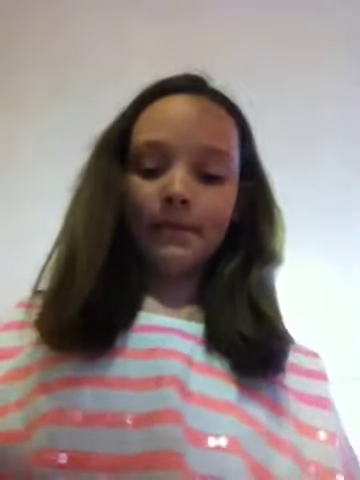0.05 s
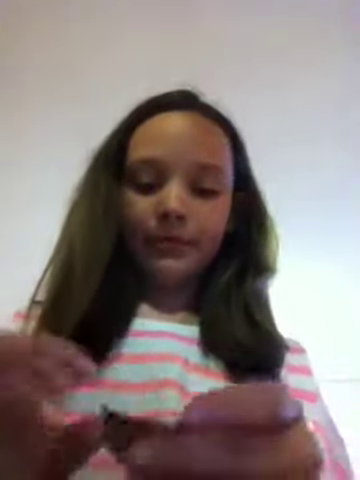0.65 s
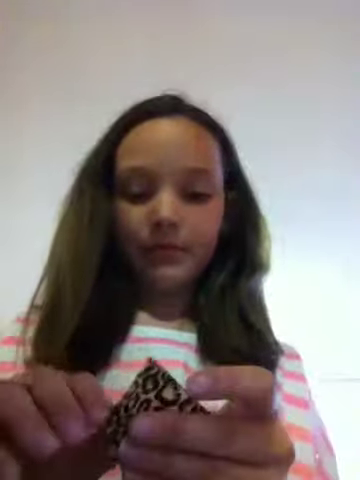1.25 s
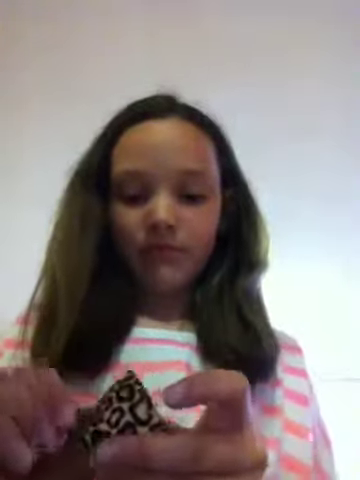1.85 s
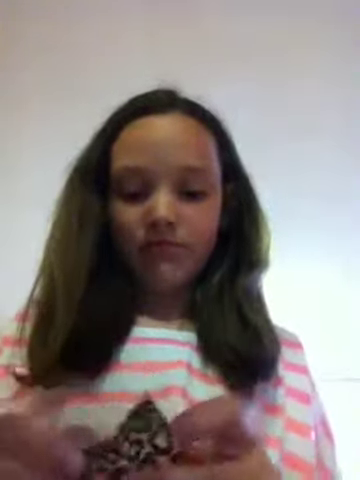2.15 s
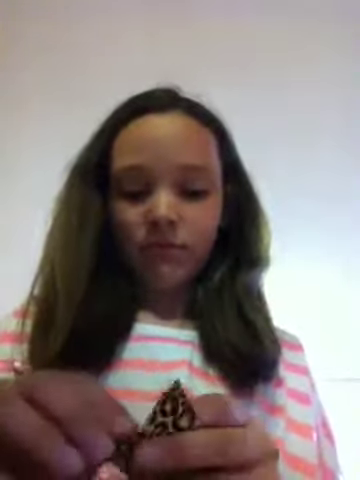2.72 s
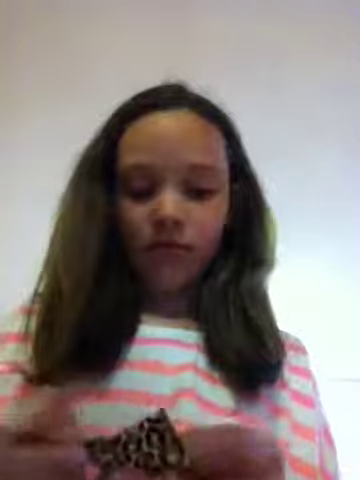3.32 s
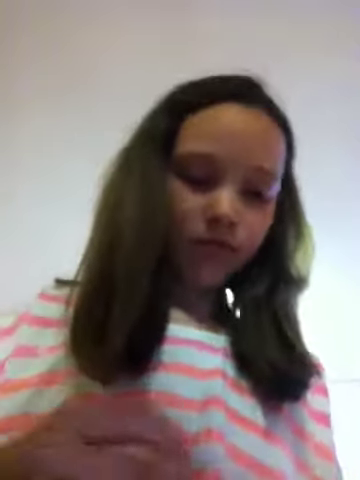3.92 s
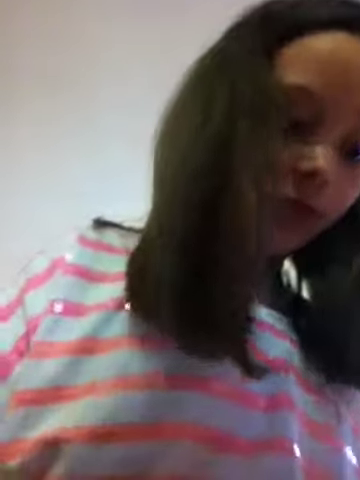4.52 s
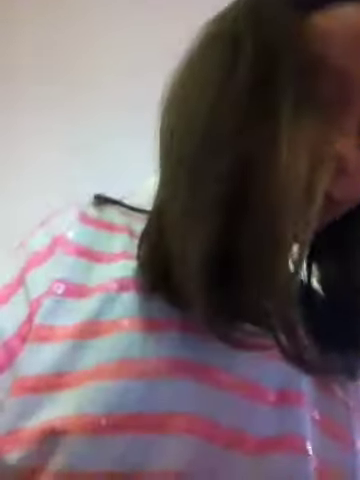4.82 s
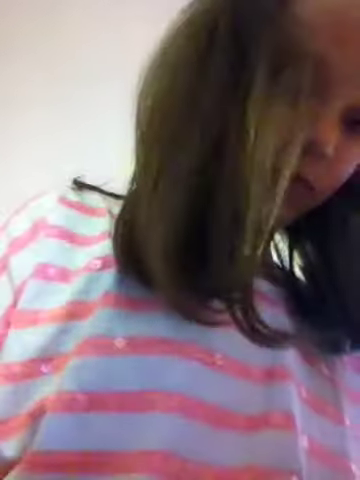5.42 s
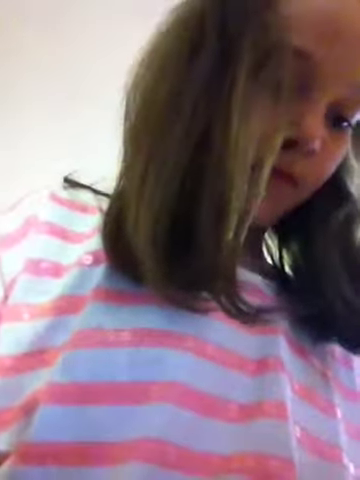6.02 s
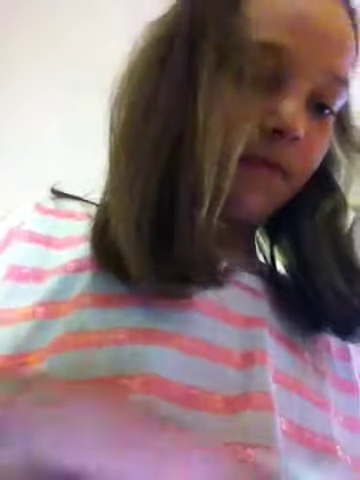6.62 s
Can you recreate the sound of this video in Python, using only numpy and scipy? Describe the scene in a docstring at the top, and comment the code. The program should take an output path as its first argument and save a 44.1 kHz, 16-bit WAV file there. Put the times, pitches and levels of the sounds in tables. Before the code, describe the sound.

Duct tape is handled close to a small microphone in a small, bare room, with a faint low appliance hum and soft hiss throughout. Right at the start a strip rips off the roll, fading within a quarter of a second. A few faint ticks follow. From about 1.1 to 2.3 seconds, fingers fold and press the tape, making irregular clusters of crisp snaps over a light sticky crackle. More snaps come around 2.8 seconds, and the loudest lands near 3.2 seconds, after which the overall level dips slightly and creeps back. From about 3.5 seconds, hands and sleeves rustle softly among scattered weaker ticks, most noticeably around 4.6 seconds. From about 5.9 to 6.7 seconds, hands slide over the work surface in several short, dry strokes with a slight hollow ring and faint hoarse squeaks.

```python
"""Duct tape is handled close to a small microphone in a quiet room, where an appliance hums throughout.
First a strip rips off the roll as thousands of glue threads break. Then creases snap and tick while
sticky fingers fold and press the tape. After the loudest snap, near 3.2 s, the recorder's gain control
turns the sound down and creeps back. Later hands rustle, and at last slide over the work surface."""
import sys
import numpy as np
from scipy import signal
from scipy.fft import rfft, irfft, next_fast_len
from scipy.io import wavfile
from scipy.ndimage import uniform_filter1d

SR = 44100
rng = np.random.default_rng(int(sys.argv[2]) if len(sys.argv) > 2 else 0)


def file_out(sig):
    """Save sig as 16-bit WAV at sys.argv[1]."""
    # one column per channel
    cols = np.atleast_2d(sig).T
    # limit, then scale
    lim = np.clip(cols, -1, 1)
    pcm = np.round(lim * 32767).astype(np.int16)
    wavfile.write(sys.argv[1], SR, pcm)


N = 293841
T = np.arange(N) / SR
PADDED = next_fast_len(N + SR, real=True)
FREQS = np.maximum(np.fft.rfftfreq(PADDED, 1 / SR), 1)

# The hollow ring of the tape roll. Each row: pitch in Hz, width in Hz, level in dB.
ROLL_MODES = [(704, 38, 10), (959, 63, 14), (1250, 110, 1.5), (1640, 51, 11.5), (3000, 50, 11)]
# The creases snapping. Each row: time in seconds, level in dB, ringing pitch in Hz, # extra bass in dB, extra
# treble in dB. The row at 3.172 s is not a crease: it is the loudest snap # coming back off the desk 8 ms
# later.
SNAPS = [(0.468, -52.5, 4000, 0, 9), (.62, -55.5, 3000, 3, -11), (.744, -60, 4000, -3, -3),
         (1.1035, -48.5, 4000, 3, -7), (1.186, -42, 3930, -5, 0), (1.209, -40.5, 8140, 1, -1.5),
         (1.2536, -36, 9550, -6, -1), (1.265, -34.5, 7200, -3, 6), (1.2733, -36.5, 3820, -27, 3),
         (1.316, -50, 1800, -5, -3), (1.347, -26.5, 6300, -14, 4.5), (1.36, -26, 6020, -20, 13),
         (1.3825, -34, 6500, -7, 10), (1.3957, -40, 6660, -8, 12), (1.4255, -47, 8900, 2, 7),
         (1.5218, -44.5, 7000, -5, -3), (1.5415, -48, 4300, 0, 0), (1.565, -32, 1800, 14.5, 2),
         (1.5776, -20, 4100, -9, 1.5), (1.602, -43, 4200, -1, 10), (1.703, -51.5, 4000, 1, -1),
         (1.765, -47, 8430, 1, 0), (1.7784, -41, 8500, 6, 5), (1.791, -42, 1770, 7.5, 0.5),
         (1.799, -42.5, 4770, 9, 4), (1.822, -44.5, 7700, 8, 2), (1.9349, -23, 4280, 1, 1),
         (1.973, -41.5, 4000, 15, 8), (2.002, -46, 1900, 19, 5), (2.016, -51, 1890, 8, 1),
         (2.0437, -44.5, 1900, -4, -4), (2.0588, -39, 8800, -1, 2), (2.2356, -42.5, 8800, -11, -1),
         (2.3, -35.5, 3680, -7, 2.5), (2.316, -36, 3980, 11, -1), (2.761, -29.5, 3980, 3, -0.5),
         (2.804, -40, 4070, 3, -14), (2.877, -34, 1790, 8, -14), (2.8884, -43.5, 1900, 9, 1),
         (3.027, -45, 4800, -3, -4.5), (3.07, -48, 2400, -3, 5), (3.1137, -26, 1810, -3, -4),
         (3.132, -35, 3800, -5, 1), (3.14, -27.5, 3840, 3, -0.5), (3.147, -40, 2000, -5, -14),
         (3.1625, -24.5, 2370, -2, 2), (3.165, -9.5, 1800, -2, -6), (3.172, -31, 1300, 2, -6),
         (3.2475, -42.5, 3900, -3, -2), (3.276, -42, 3500, -4, -9), (3.2803, -33.5, 2290, -8, -6),
         (3.492, -44, 3580, -5, -4), (3.7172, -42, 6300, -14, -4.5), (3.9956, -45, 3300, 8, -1.5),
         (4.532, -38.5, 3100, 9.5, -6), (4.548, -35.5, 1600, 7, -2.5), (4.6025, -42, 3180, -9, -6),
         (4.6435, -43.5, 3200, 5, 2), (4.6871, -43, 3300, -6, -5), (4.9277, -40.5, 3560, -15, -6.5),
         (5.0366, -45, 2300, 7, -11), (5.051, -37.5, 3950, -13, -4), (5.144, -49, 3600, -4, -3),
         (5.344, -42.5, 6300, -15, -2), (5.351, -45, 6300, -8, -1), (5.384, -54, 7600, -10, 4),
         (5.416, -53, 2150, -12, -1), (5.44, -48.5, 2230, -14, -4), (5.452, -52, 2280, -14, -10),
         (5.468, -49, 2250, -14, -7), (5.487, -50, 2250, -15, -1), (5.496, -48, 2970, -4, 5),
         (5.666, -45, 3760, -27, -2), (6.043, -39.5, 4140, -6, 2), (6.45, -39, 7800, -10, 2),
         (6.48, -46, 2800, 1, -16), (6.554, -52, 7500, -9.5, 0)]
HARD_SNAP_DB = -26  # other snaps are weighed against one of this level
# The tone of snapping, crackling tape. Each row: frequency in Hz, level in dB.
SNAP_COLOUR = [(150, -37), (300, -7.5), (750, -4.5), (1200, -5.5), (2300, 2), (5000, 1), (8500, 2.5),
               (11500, -1.5), (14000, -11), (16000, -22)]
# The ring of the folded tape. Each row: pitch in Hz, width in Hz, level in dB.
FOLD_MODES = [(576, 100, -2), (1114, 145, 6), (1840, 250, -0.5), (2280, 110, -6.5), (3100, 240, -10),
              (3980, 220, -2.5), (4770, 130, -6.5), (5830, 292, -4.5), (7500, 340, -10), (8330, 270, -19),
              (12200, 500, -6.5)]


def undb(db):
    """Turn decibels into a number to multiply by."""
    return 10 ** (np.asarray(db) / 20)


def unit(x):
    """Scale a signal so that its average (rms) level is 1."""
    return x / np.sqrt(np.mean(x ** 2))


def colour(points, freqs):
    """Join (Hz, dB) points into a tone curve: one gain for each frequency."""
    hz, db = np.transpose(points)
    return undb(np.interp(np.log(freqs), np.log(hz), db))


def ring(modes, freqs):
    """The response of an object that rings at several pitches; narrow ones ring longer."""
    return sum(undb(db) / (1 + 1j * (freqs ** 2 - hz ** 2) / (freqs * width)) for hz, width, db in modes)


def shape(x, response):
    """Filter a full-length signal with a tone curve and bring it to level 1."""
    return unit(irfft(rfft(x, PADDED) * response, PADDED)[:N])


def walk(rate):
    """A smooth random wobble of size 1 that turns about `rate` times a second."""
    step = max(int(SR / rate), 1)
    stairs = np.repeat(rng.standard_normal(N // step + 1), step)
    return unit(uniform_filter1d(stairs, step)[:N])


def slips(rate, spread_db):
    """Tiny random clicks, about `rate` a second: many weak ones, a few strong."""
    happens = rng.random(N) < rate / SR
    return happens * rng.choice([-1, 1], N) * undb(spread_db * np.minimum(rng.exponential(size=N), 4))


def shifting(x, response, flicker_db, rate):
    """Like shape, but each band of pitches swells and fades as the contact moves."""
    spectrum = rfft(x, PADDED) * response
    centres = np.log(np.geomspace(600, 13000, num=16))
    masks = (np.interp(np.log(FREQS), centres, one) for one in np.eye(len(centres)))
    bands = (irfft(spectrum * mask, PADDED)[:N] for mask in masks)
    return unit(sum(band * undb(flicker_db * walk(rate)) for band in bands))


def envelope(start_s, length_s, attack_s, release_s):
    """Rise, hold until the movement ends, die away."""
    age = T - start_s
    return np.clip(age / attack_s, 0, 1) * np.exp(-np.maximum(age - length_s, 0) / release_s)


def mains_hum(hz=120, waver_db=0.8):
    """A low 120 Hz hum, heard wavering and briefly fading as it beats against the room's rumble."""
    # The hum's loudness as it is heard. Each row: time in seconds, level in dB.
    hum_levels = [(0.0, -53), (0.22, -47.5), (0.72, -49.5), (2.56, -47), (2.61, -66), (2.69, -46.5),
                  (3.06, -43.5), (3.13, -49.5), (3.56, -44.5), (3.62, -51.5), (4.03, -43.5), (4.1, -55),
                  (4.28, -44.5), (5.08, -47), (5.13, -56), (5.22, -45.5), (6.66, -46)]
    level_db = np.interp(T, *np.transpose(hum_levels)) + waver_db * walk(9)
    return np.sqrt(2) * undb(level_db) * np.sin(2 * np.pi * hz * T)


def appliance(swell_db=1.6, swell_start_s=4.6, swell_s=0.58):
    """An appliance sings faint tones and stirs a low drone in the room; both swell a little late on."""
    # The appliance's tones. Each row: pitch in Hz, level before the swell in dB.
    hum_tones = [(146.4, -54.5), (220.7, -60.5), (240, -60), (328.4, -70), (387.6, -71), (441.4, -69),
                 (651.4, -76)]
    # The low notes at which the room rings. Each row: pitch in Hz, width in Hz, level in dB.
    drone_modes = [(119, 12, -2), (125, 40, 0.5), (191.7, 15.7, 2.5), (223.4, 7.3, -4.5)]
    tones = 0
    for hz, db in hum_tones:
        level = np.sqrt(2) * undb(db + 2.45 * walk(4))
        phase = 2 * np.pi * (hz * T + rng.random()) + 0.21 * walk(4.9)
        tones = tones + level * np.sin(phase)
    low_band = 1 / (1 + (FREQS / 330) ** 4) / (1 + (85 / FREQS) ** 4)  # keeps 85 to 330 Hz
    drone = undb(-53) * shape(rng.standard_normal(N), abs(ring(drone_modes, FREQS)) * low_band)
    swell = undb(swell_db * np.clip((T - swell_start_s) / swell_s, 0, 1))
    return swell * (tones + drone)


def soft_hiss(above_600_hz_db=-60):
    """A soft, steady hiss, with its loudness set by the part above 600 Hz."""
    # The tone of the quiet room. Each row: frequency in Hz, level in dB.
    air_colour = [(15, -69.5), (25, -27.5), (84, -22.5), (102, 5.5), (123, 0), (166, -10), (200, -3),
                  (270, -20), (503, -24), (1130, -35), (2000, -36.5), (2160, -37), (2350, -36.5),
                  (11300, -42.5), (16000, -48.5)]
    # nothing may be stronger than it is at 290 Hz, which flattens the bass
    gain = np.minimum(colour(air_colour, FREQS), colour(air_colour, 290))
    upper_share = np.sqrt(np.sum(gain[FREQS > 600] ** 2) / np.sum(gain ** 2))
    return undb(above_600_hz_db) / upper_share * shape(rng.standard_normal(N), gain)


def rip(slacken_s=0.1, roll_db=-18):
    """Glue threads break in uneven surges; the roll rings, and so does the strip while it is taut."""
    # How hard the strip is pulled. Each row: time in seconds, level in dB.
    rip_pull = [(0, -25), (.036, -26), (.06, -30.5), (.125, -34.5), (.14, -33), (.17, -38), (.197, -43.5),
                (.225, -61), (.27, -100)]
    # The tone of the rip. Each row: frequency in Hz, level in dB.
    rip_colour = [(180, -43), (300, -30), (348, -38), (385, -7.5), (645, -10), (725, -7), (1100, -11),
                  (1250, 1), (1460, -6.5), (1610, -5), (2030, -7), (3760, 0), (7820, 2.5), (13300, -13),
                  (16000, -31)]
    # The ring of the taut strip. Each row: pitch in Hz, width in Hz, level in dB.
    strip_modes = [(2960, 300, 7.5), (3730, 410, 3), (4540, 300, -4), (5800, 350, 3), (8320, 1000, -3)]
    pull = undb(np.interp(T, *np.transpose(rip_pull)))
    threads = slips(rate=7000, spread_db=1.5) * undb(0.96 * walk(700))
    film = colour(rip_colour, FREQS)
    taut = np.exp(-T / slacken_s)
    ringing = shape(threads, film * abs(1 + ring(strip_modes, FREQS)))
    slack = shifting(threads, film, flicker_db=1.5, rate=59)
    roll = shape(threads, ring(ROLL_MODES, FREQS))
    return pull * (taut * ringing + (1 - taut) * slack + undb(roll_db) * roll)


def snap(ring_hz, bass_db, treble_db, fold_modes, crumple_s, noise, ring_db):
    """One crease starts to give, flips with a sharp kick, crumples for a moment and rings out."""
    size = len(noise)
    t = (np.arange(size) - size // 8) / SR  # zero at the kick
    freqs = np.maximum(np.fft.rfftfreq(size, 1 / SR), 1)
    give = 0.28 * np.exp(-abs(t) / 0.00064)
    crumple = 0.17 * np.exp(-abs(t) / (2 * max(crumple_s, 1e-4)))
    flutter = 0.066 * np.exp(-abs(t) / 0.0044)
    kick = (t == 0) + noise * np.where(t < 0, give, crumple + flutter)
    # a long crease is fuller, a short one brighter
    tilt = colour([(750, bass_db), (1700, 0.0089), (4200, 0.009), (6500, treble_db)], freqs)
    modes = undb(ring_db) * ring(fold_modes + [(ring_hz, 0.3 * ring_hz, -5)], freqs)
    gain = colour(SNAP_COLOUR, freqs) * tilt * abs(1 + modes)
    # build the filter so that the fold rings only after it is kicked (minimum phase)
    cepstrum = irfft(np.log(gain + 1e-9)) * (1 + np.sign(np.fft.fftfreq(size)))
    click = irfft(np.exp(rfft(cepstrum)) * rfft(kick))
    return click / np.sqrt(uniform_filter1d(click ** 2, size=88).max())  # loudest 2 ms at level 1


def creases(ring_db, crumpling, bends, detune=0.008, scatter_db=0.8):
    """The tape snaps as it is folded and pressed; hard snaps flip fast, weak ones crumple longer."""
    noises = crumpling * rng.standard_normal((len(SNAPS), 2048))
    out = np.zeros(N)
    for (time_s, db, *tone), noise, bend in zip(SNAPS, noises, bends):
        start = int(time_s * SR) - len(noise) // 8
        hardness_db = db - HARD_SNAP_DB
        crumple_s = 0.00094 * 2 ** (-hardness_db / 36)  # halves for every 36 dB
        crumple_gain = undb(-0.69 * max(hardness_db, 0))  # the hardest snaps flip more cleanly
        # the fold is bent differently each time, so its ring shifts in pitch and strength
        bent = [(hz * (1 + detune * pitch), width, mode_db + scatter_db * strength)
                for (hz, width, mode_db), (pitch, strength) in zip(FOLD_MODES, bend)]
        click = snap(*tone, bent, crumple_s, crumple_gain * noise, ring_db)
        out[start:start + len(click)] += undb(db) * click
    return out


def fingers(light_touch_db=-72, press_db=-59.5, press_s=0.04):
    """Glue crackles faintly under the fingertips, louder as they press around each snap."""
    press = 0
    for time_s, db, *_ in SNAPS:
        strength = undb(press_db + 0.31 * (db - HARD_SNAP_DB))
        press = np.maximum(press, strength * np.exp(-abs(T - time_s) / press_s))
    working = envelope(start_s=0.54, length_s=3.9, attack_s=0.023, release_s=0.1)
    # each small unsticking is a cluster of a few milliseconds
    clusters = uniform_filter1d(abs(slips(rate=110, spread_db=1.0)), size=150) * undb(2.7 * walk(25.02))
    crackle = shape(clusters * rng.standard_normal(N), colour(SNAP_COLOUR, FREQS))
    return working * (undb(light_touch_db) + press) * crackle


def rustle():
    """Hands and sleeves brush about, catching and letting go in tiny steps."""
    # The brushing movements. Each row: start in seconds, length in seconds, level in dB,
    # brightness in dB.
    brushes = [(3.47, 0.04, -52.5, 1), (4.204, 0.9, -57.5, -1.5), (4.589, 0.014, -49, -1),
               (4.612, 0.028, -45.5, -2), (5.34, 0.044, -58, 6), (5.447, 0.065, -57.5, 2),
               (5.664, 0.011, -50, 6), (5.7, 0.034, -56.5, 3.5)]
    # The tone of the rustle. Each row: frequency in Hz, level in dB.
    rustle_colour = [(240, -30), (400, -18), (560, 0), (800, -10), (1100, -5), (1550, -14), (2200, 0),
                     (2600, -10.5), (3190, 2), (4500, -5.5), (8060, -10), (15000, -29)]
    catches = slips(rate=3000, spread_db=1.5) * undb(2.4 * walk(120))
    cloth = shifting(catches, colour(rustle_colour, FREQS), flicker_db=2.5, rate=40)
    out = 0
    for start_s, length_s, db, bright_db in brushes:
        tilt = colour([(2000, -bright_db), (6000, bright_db)], FREQS)
        movement = envelope(start_s, length_s, attack_s=0.23 * length_s, release_s=0.016)
        out = out + undb(db) * movement * shape(cloth, tilt)
    return out


def slides(grit_db=-5):
    """Dry sliding wakes the hollow roll and a hoarse squeak whose pitch moves with the contact."""
    # The sliding strokes. Each row: start in seconds, length in seconds, level in dB, hollow ring in dB,
    # squeak pitch in Hz, squeak in dB. Ring and squeak levels are relative to the stroke's hiss.
    strokes = [(5.869, 0.033, -47.5, -14, 1048, -13), (5.899, 0.047, -54.5, -10, 1045, -14),
               (5.947, 0.037, -45.5, -13.5, 1640, -16), (5.995, 0.062, -54.5, -5, 880, -10),
               (6.222, .02, -48, -6.5, 3050, -9), (6.241, .047, -47, -2.5, 952, 2),
               (6.291, 0.063, -44.5, -4, 1640, -9), (6.365, 0.066, -47.3, -18, 2870, -8),
               (6.429, 0.012, -49.5, -22, 3910, 6.5), (6.437, 0.016, -47, -18, 3570, -10),
               (6.482, 0.049, -57, -12, 1870, -8), (6.618, 0.068, -45, -8, 1843, -8)]
    # The tone of the sliding hiss. Each row: frequency in Hz, level in dB.
    slide_colour = [(290, -40), (500, -7), (823, -18), (935, -34), (1110, -5), (1650, -9), (1800, -11),
                    (2170, -11.5), (2920, -2.5), (4540, -4.5), (5780, -2.5), (9510, -6), (15000, -26)]
    friction = slips(rate=7000, spread_db=1.0) * undb(1.8 * walk(220))
    grit = undb(grit_db) * unit(slips(rate=190, spread_db=1.0))  # catches on coarser grains
    hiss = shifting(unit(friction) + grit, colour(slide_colour, FREQS), flicker_db=1.5, rate=66)
    hollow = shifting(friction, ring(ROLL_MODES, FREQS), flicker_db=2.2, rate=35)
    rasp = unit(undb(2.9 * walk(130)))
    pitch_wobble = 1 + 0.0153 * walk(40) + 0.055 * walk(700)
    out = 0
    for start_s, length_s, db, ring_db, squeak_hz, squeak_db in strokes:
        squeak = np.sqrt(2) * rasp * np.sin(2 * np.pi * np.cumsum(squeak_hz * pitch_wobble) / SR)
        push = envelope(start_s, length_s, attack_s=0.38 * length_s, release_s=0.013)
        out = out + push * undb(db) * (hiss + undb(ring_db) * hollow + undb(squeak_db) * squeak)
    return out


def room(x, echo_db=-8, low_fade_s=0.39, high_fade_s=0.36):
    """The walls of a small bare room send back a blur of echoes; the treble dies first."""
    # The tone of the echoes. Each row: frequency in Hz, level in dB.
    echo_colour = [(200, -4), (900, 0.5), (2200, -2.5), (4000, -0.5), (6500, 1.5), (11000, -6.5),
                   (16000, -4.5)]
    noise = shape(rng.standard_normal(N), colour(echo_colour, FREQS))
    low = signal.sosfilt(signal.butter(1, 4500, fs=SR, output="sos"), noise)
    tail = low * undb(-60 * T / low_fade_s) + (noise - low) * undb(-60 * T / high_fade_s)
    tail = tail * np.clip(T / 0.00069, 0, 1)
    return undb(echo_db) * signal.fftconvolve(x, tail / np.linalg.norm(tail))[:N]


def scene():
    """Tape and hands with their echoes, over the hum and hiss of the room."""
    tearing = rip()
    rubbing = fingers() + rustle() + slides()
    bends = rng.standard_normal((len(SNAPS), len(FOLD_MODES), 2))
    # the walls gather each snap from all directions, which evens out its tone
    snaps_at_walls = undb(-6) * creases(ring_db=1, crumpling=False, bends=bends)
    echoes = room(snaps_at_walls + undb(-20) * tearing + undb(-3) * rubbing)
    close_snaps = creases(ring_db=11, crumpling=True, bends=bends)
    background = mains_hum() + appliance() + soft_hiss()
    return (background + tearing + close_snaps + rubbing + echoes)[None]


def record(dry, threshold_db=-9, recover_db_per_s=3.0, react_s=0.02, ceiling=0.75, top_hz=16100):
    """Gain control dips after a loud peak and creeps back; peaks are rounded and the top treble is cut."""
    level_db = 20 * np.log10(abs(dry[0]) + 1e-9)
    over_db = np.clip(level_db - threshold_db, 0, 4.2)
    recovery_db = recover_db_per_s * T
    held_db = np.maximum.accumulate(over_db + recovery_db) - recovery_db
    smoothing = np.exp(-1 / (react_s * SR))
    dip_db = signal.lfilter([1 - smoothing], [1, -smoothing], held_db)
    rounded = ceiling * np.tanh(dry * undb(-dip_db) / ceiling)
    return signal.sosfilt(signal.ellip(8, .2, 70, top_hz, fs=SR, output="sos"), rounded)


dry = scene()
out = record(dry)
file_out(out)
```